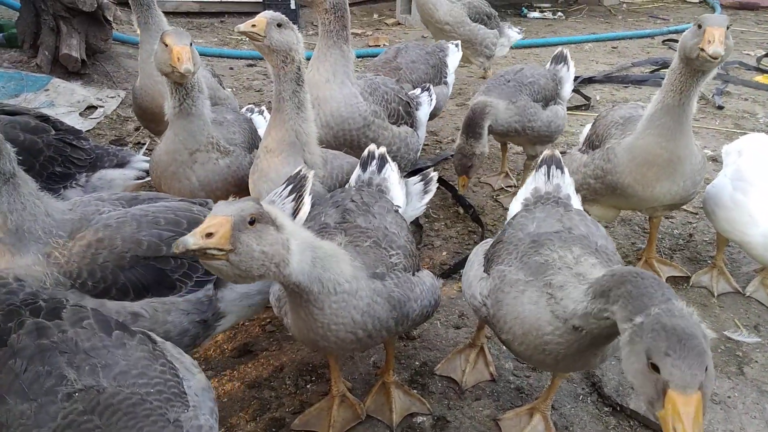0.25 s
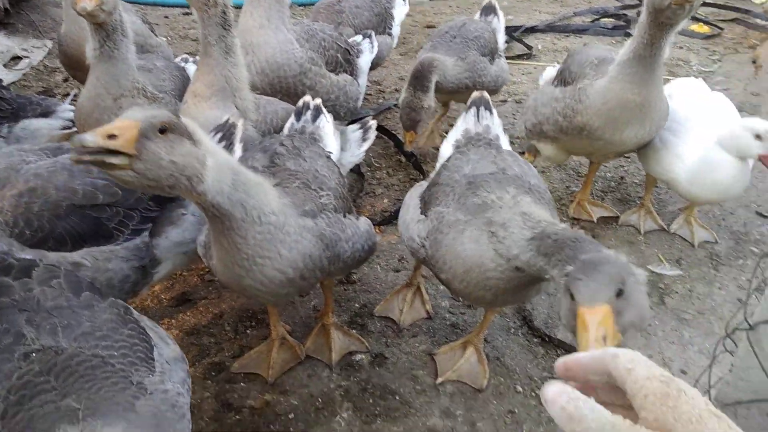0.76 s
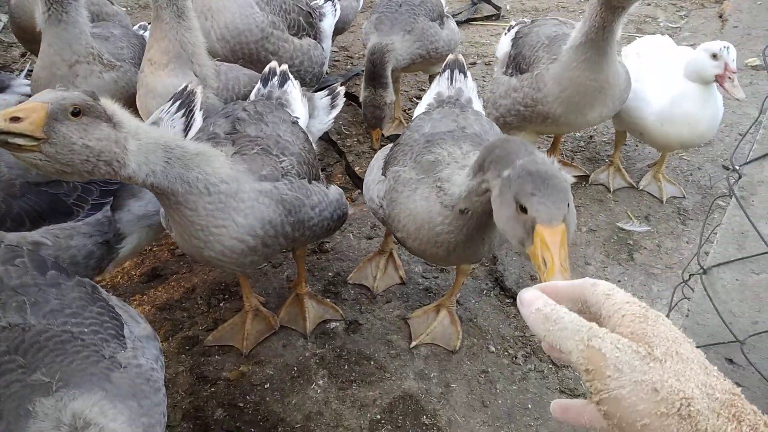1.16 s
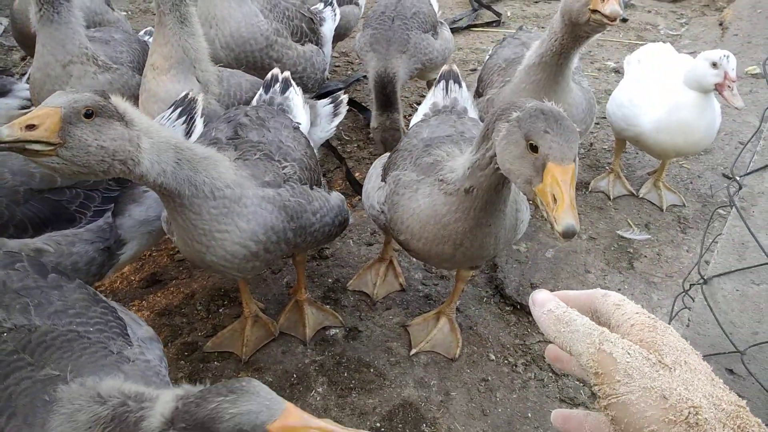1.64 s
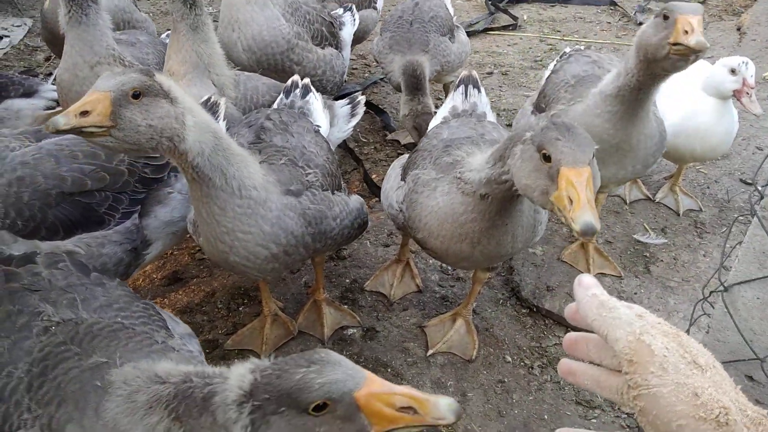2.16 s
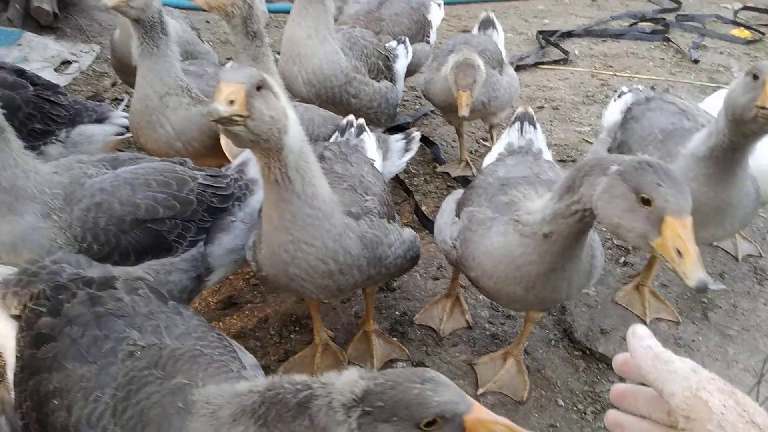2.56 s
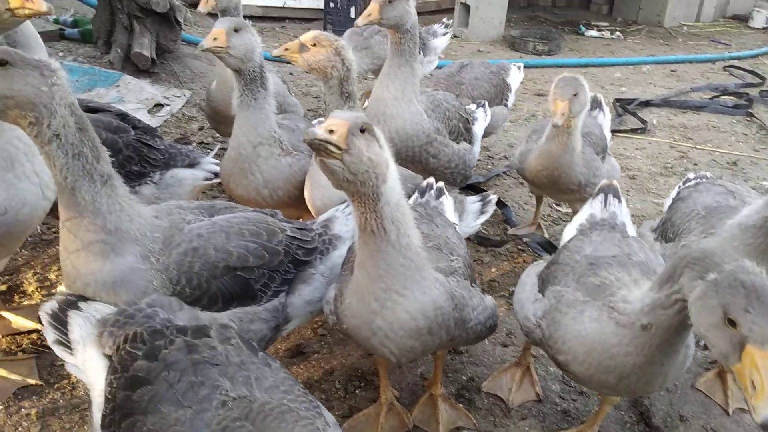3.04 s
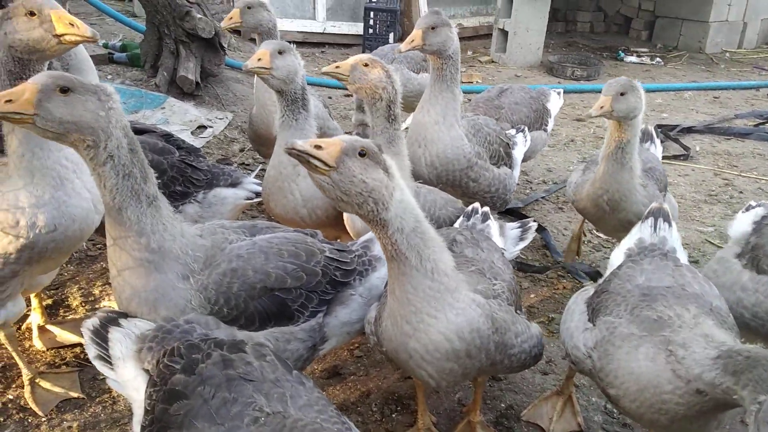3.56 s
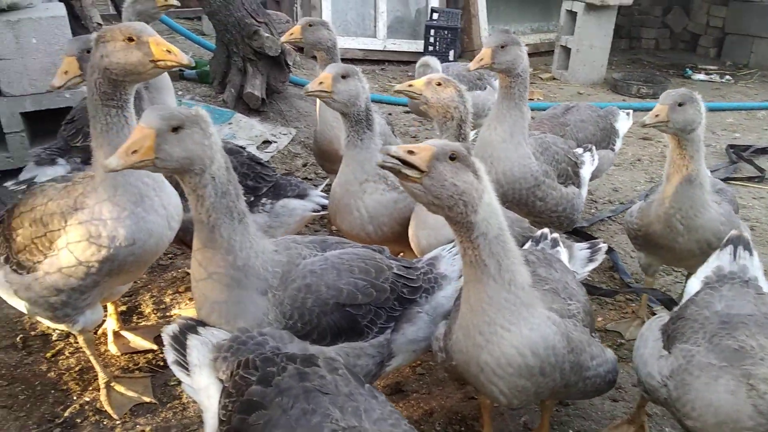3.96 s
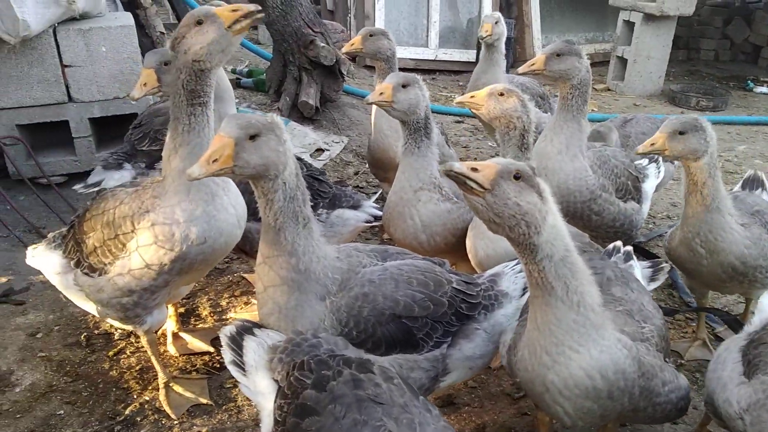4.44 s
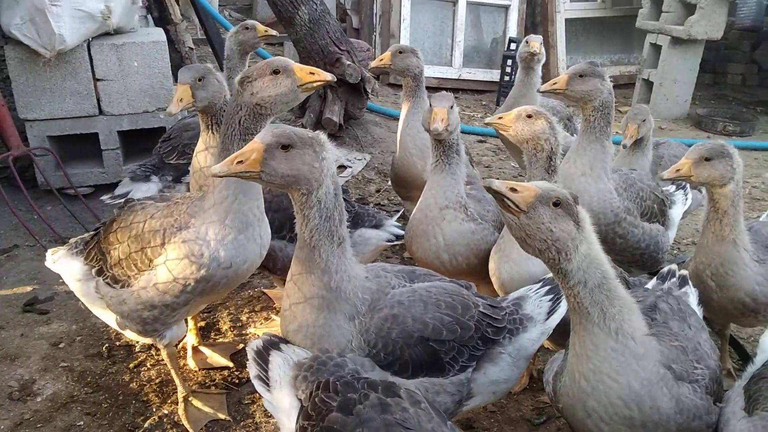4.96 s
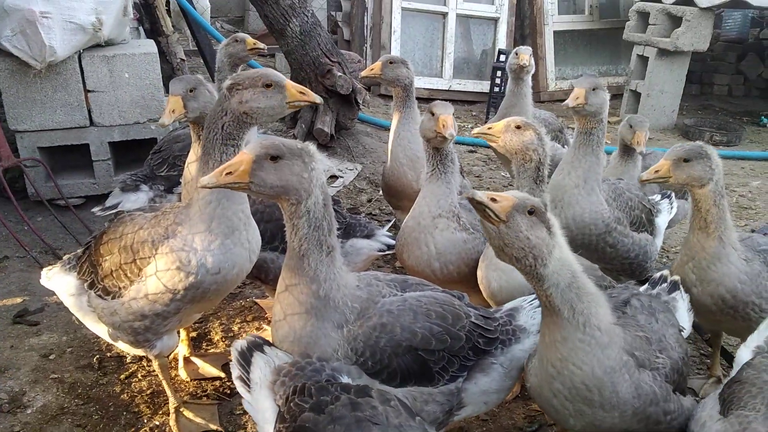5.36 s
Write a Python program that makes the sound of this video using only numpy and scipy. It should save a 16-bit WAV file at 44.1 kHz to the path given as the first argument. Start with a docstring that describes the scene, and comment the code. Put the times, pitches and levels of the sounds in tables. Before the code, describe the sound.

Young geese crowd close to the microphone in a dirt yard, with quiet low rumble and a short, faint echo from walls. The sound begins mid-yelp. Each yelp lasts under a tenth of a second: a clear tone near 1 kHz leaps up about an octave, breaks into rasp and tumbles down. Three come at 0.5-0.8 s, then groups at 1.3-1.7, 2.2-2.5 and 3.0-3.3 s. Short, nasal, hoarse gabbles at roughly 600-700 Hz fill between them, with thin whistles mostly around 1.5-1.9 kHz and a few very faint shrill squeals. Dry bill snaps click near 2.1, 2.25, 4.4 and 4.9 s; soft bumps and faint scuffs lie underneath. From 3.4 to 4.9 s rasping gabble runs almost unbroken and grows louder, with blurred distant birds behind. Four separate yelps follow from 4.9 s with clearer gaps, until an abrupt end at about 5.5 s.

```python
"""Young geese round an outstretched hand

A flock crowds close to the microphone in a dirt yard, all calling at once.
Near birds yelp in quick arches of pitch that break into a rasp; others gabble in short nasal notes
or whistle like goslings. Tones are sums of sines; rasps are irregular pulses through resonances.
Bills snap, feet scuff and low bumps knock; birds further back are heard by way of the walls,
which return a faint echo (scattered, decaying reflections) over low outdoor rumble (shaped noise)."""
import sys
import numpy as np
from scipy import signal
from scipy.fft import rfft, irfft, next_fast_len
from scipy.io import wavfile
from scipy.ndimage import uniform_filter1d

SR = 44100
rng = np.random.default_rng(int(sys.argv[2]) if len(sys.argv) > 2 else 0)


def wav_record(signal):
    """Record a signal, one row per channel, as 16-bit PCM in the file named by sys.argv[1]."""
    frames = np.transpose(np.atleast_2d(signal))
    bounded = np.clip(frames, -1, 1)
    # unit amplitude maps onto the largest positive 16-bit level
    quanta = np.round(bounded * 32767).astype(np.int16)
    wavfile.write(sys.argv[1], SR, quanta)


N = 246959

# spray of a bill snap or a scuff, only its shape counts: f/Hz, level/dB
SPRAY = [(300, -20), (1500, -49), (4500, -10), (7000, 7), (9500, 10), (12000, 11), (16000, -7)]
YELP_TAIL_S = 0.019  # a yelp trails off for this long after its fall


def from_db(db):
    """Amplitude ratio of a level in dB."""
    return 10 ** (np.asarray(db) / 20)


def rms_one(x):
    """Bring a sound to an RMS of 1."""
    return x / np.sqrt(np.mean(x ** 2) + 1e-20)


def span(start, end):
    """Sample times of one call, at least 5 ms of them."""
    return np.arange(round(start * SR), round(max(end, start + .005) * SR)) / SR


def add(out, t, sound):
    """Mix a call into the scene at its own times."""
    at = np.round(t * SR).astype(int)
    inside = (at >= 0) & (at < N)
    out[at[inside]] += sound[inside]


def waver(t, rate):
    """Random line of spread about 1, bounded at 1.6, bending at rate new values a second."""
    steps = (t - t[0]) * rate
    values = np.clip(rng.standard_normal(400), -1.6, 1.6)
    return np.interp(steps, np.arange(400), values)


def fade(t, start, end, attack, release):
    """Rounded opening and closing of a note, half open at its start and its end."""
    opening = (t - start) / attack + .5
    closing = (end - t) / release + .5
    return np.sin(np.pi / 2 * np.clip(np.minimum(opening, closing), 0, 1)) ** 2


def band(x, low_hz, high_hz, order=3):
    """Keep the range between two frequencies."""
    edges = [low_hz, min(high_hz, .49 * SR)]
    return signal.sosfilt(signal.butter(order, edges, "band", fs=SR, output="sos"), x)


def resonate(x, hz, width_hz):
    """One resonance with gain 1 on top."""
    r = np.exp(-np.pi * width_hz / SR)
    poles = [1, -2 * r * np.cos(2 * np.pi * hz / SR), r * r]
    return signal.lfilter(np.array([1, 0, -1]) * (1 - r * r) / 2, poles, x)


def colour(x, spectrum):
    """Shape a sound by a table of f/Hz, level/dB."""
    size = next_fast_len(len(x))
    hz, db = np.transpose(spectrum)
    bins = np.maximum(np.fft.rfftfreq(size, 1 / SR), 1)
    gain = from_db(np.interp(np.log(bins), np.log(hz), db))
    return irfft(rfft(x, size) * gain, size)[:len(x)]


def cycles(t, pitch, jitter):
    """Phase of a membrane whose pitch trembles quickly and wanders slowly."""
    unsteady = 1 + jitter * waver(t, 400) + .016 * waver(t, 70)
    return 2 * np.pi * (np.cumsum(pitch * unsteady) / SR + rng.random())


def yelps(tone_db=1):
    """Each yelp is a clear arch of pitch, a rasp that peaks early, and a low note under its fall."""
    # arched yelps: start t/s, length t/s, opening pitch f/Hz, tone level/dB before tone_db is added,
    # rasp level/dB, treble of the rasp level/dB
    yelp_calls = [(-.023, 0.062, 965, -22, -24.5, -9), (0.471, 0.071, 1036, -23, -21.5, -10.5),
                  (.61, .078, 1026, -19.5, -24, -7), (0.737, 0.086, 994, -19.5, -22.5, -8),
                  (1.331, 0.067, 978, -22, -30, -6.5), (1.461, 0.078, 968, -19, -22.5, -8.5),
                  (1.61, 0.081, 984, -20, -28.5, -3), (2.181, 0.065, 986, -23, -27.5, -10.5),
                  (2.317, 0.081, 979, -21.5, -22, -12), (2.452, 0.069, 954, -31, -31.5, -10.5),
                  (2.97, 0.067, 984, -27, -33.5, -8), (3.098, 0.081, 993, -23, -30.5, -6.5),
                  (3.246, .083, 1022, -24.5, -24, -12), (3.782, 0.089, 963, -45, -31, -35),
                  (3.952, 0.071, 979, -29, -25, -17.5), (4.94, 0.062, 969, -23.5, -22.5, -17.5),
                  (5.07, 0.095, 1030, -24.5, -28, -16.5), (5.213, 0.094, 1023, -22.5, -31, -10.5),
                  (5.391, 0.082, 1057, -23, -30, -9)]
    break_share, rasp_crest_share = .37, 0.34  # places along a yelp: voice breaks upward, hoarsest point
    low_delay_s = .012  # the low note comes in this long after the break
    low_share, low_db = .58, -14.5  # its share of the opening pitch, its level against the rasp
    out = np.zeros(N)
    for start, length, hz, db, rasp_db, treble_db in yelp_calls:
        jump, foot = start + break_share * length, start + length
        end = foot + YELP_TAIL_S
        add(out, *yelp(start, jump, foot, end, hz, db + tone_db))
        add(out, *rasp(start + .003, start + rasp_crest_share * length, foot, rasp_db, treble_db))
        add(out, *nasal_note(jump + low_delay_s, end, low_share * hz, 0, rasp_db + low_db))
    return out


def yelp(start, jump, foot, end, hz, open_db, crest_db=-15, overtone_db=-16, overtone_step_db=-6,
         buzz_db=-8):
    """The pitch clings to one windpipe resonance, jumps to the next, and tumbles back down through them."""
    # upper resonances that ring in a full yelp, for a 1000 Hz opening: f/Hz, width f/Hz, level/dB
    yelp_modes = [(1460, 104, 5.5), (2026, 107, 7), (2620, 74, 7), (2904, 460, -4.5), (4720, 160, -14.5),
                  (6330, 310, -10)]
    jitter, shimmer_db = .04, 2.2
    break_db, fall_db, tail_db = -7, -5, -10  # the tone at those moments, against its opening
    step_dip_db = 5.5  # the falling tone drops out between two resonances
    buzz_growth, buzz_from_db = 0.7, -23.5  # yelps louder than this buzz more: extra dB per dB
    t = span(start - .01, end + .01)
    crest = (jump + foot) / 2

    turns = [start, (start + jump) / 2, jump - .003, jump + .001, jump + .014, crest + .003,
             foot - .02, foot - .009, foot - .004, foot + .007, foot + .015, foot + .04]
    arch = [.93, 1.0, 1.15, 1.5, 1.6, 2.05,
            1.56, 1.38, 1.02, .88, .62, .56]
    wander = 1 + 0.0182 * waver(t, 60)  # no two yelps bend quite alike
    pitch = hz * wander * np.interp(t, np.maximum.accumulate(turns), arch)
    phase = cycles(t, pitch, jitter)

    # the clear tone gives way to rasp at the crest
    moments = [start, start + .01, jump - .006, jump + .006, crest,
               foot - .018, foot - .007, foot, foot + .011, end]
    levels = [-1, 0, -1, break_db, break_db + crest_db,
              fall_db - 3, fall_db - step_dip_db, fall_db, tail_db - step_dip_db, tail_db]
    db = open_db + np.interp(t, moments, levels)
    overtones = 0
    for k in range(2, 5):
        level_db = overtone_db + overtone_step_db * (k - 2.5) + waver(t, 250)
        overtones = overtones + from_db(level_db) * np.sin(k * phase)
    tone = np.sqrt(2) * (np.sin(phase) + overtones) * from_db(db + shimmer_db * waver(t, 300))

    # the hard push at the start also sets the upper pipe buzzing
    push_db = np.interp(t, [start, start + 0.011, jump + 0.0097, foot, end], [-36, -3, -4, -20.0, -43])
    loudness_db = open_db + buzz_db + buzz_growth * (open_db - buzz_from_db)
    buzz = rms_one(pipe(flapping(t), yelp_modes, hz / 1000)) * from_db(loudness_db + push_db)
    return t, (tone + buzz) * fade(t, start + .005, end, .009, .012)


def gabbles(tone_db=1.6):
    """Each gabble is a gliding nasal note with a rasp that swells and sinks over it."""
    # hoarse nasal gabbles: start t/s, length t/s, pitch f/Hz, glide f/Hz, tone level/dB before tone_db
    # is added, rasp level/dB, treble of the rasp level/dB, place of the crest (0-1)
    gabble_calls = [(0.119, 0.026, 572, -78, -37.5, -35.5, -21, 0.4),
                    (0.293, 0.033, 573, -40, -41.5, -31.5, -10, 0.23),
                    (0.357, 0.061, 697, -53, -38.5, -29, -12, 0.46),
                    (0.421, 0.056, 640, 37, -38.5, -36.5, -9.5, 0.56),
                    (0.641, 0.036, 603, 8, -29.5, -30.5, 0, 0.86),
                    (0.685, 0.058, 628, -145, -38, -28, -24, 0.6),
                    (0.864, 0.078, 749, 123, -39.5, -35, -19, 0),
                    (0.918, 0.067, 723, 126, -38, -36.5, -10.5, 0.95),
                    (1.031, 0.084, 725, 144, -36.5, -33, -13, 0.76),
                    (1.133, 0.041, 527, 143, -42, -36, -19, 0.6),
                    (1.169, 0.092, 722, 49, -39, -28.5, -15, .7),
                    (1.295, 0.069, 618, 243, -40, -35, -11, .7),
                    (1.436, 0.035, 635, 48, -36, -29, -15, 0.6),
                    (1.523, 0.047, 576, 36, -40, -28, -13, 0.35),
                    (1.572, 0.049, 587, 108, -37.5, -28, -11, 0.85),
                    (1.691, 0.1, 670, 81, -37, -27.5, -10, .4),
                    (1.858, 0.072, 671, 15, -33.5, -28, -4.5, 0.37),
                    (1.937, 0.029, 597, -83, -35, -38, -14, 0.2),
                    (2.01, 0.12, 603, 161, -37, -23.5, -14.5, 0.82),
                    (2.131, 0.048, 586, -140, -38, -33, -17, 0.04),
                    (2.211, 0.059, 592.5, 36, -37, -26, -13, 0.83),
                    (2.274, 0.057, 599, 60, -54, -36, 1.5, 0.8),
                    (2.345, 0.045, 620, 114, -32.5, -35, -7, .5),
                    (2.392, 0.041, 588, -88, -33.5, -49, -23, .2),
                    (2.575, 0.046, 537.5, 62, -38, -37, -16.5, 0.8),
                    (2.606, 0.075, 389, -43, -44.5, -37, -12, 0.42),
                    (2.68, 0.059, 370, -43, -48.5, -68, -19, 0.2),
                    (2.845, 0.043, 664, -68, -40, -36, -16, 0.47),
                    (3.176, 0.1, 706, 0, -53, -39.5, -7, 0.33),
                    (3.297, 0.071, 526, -30, -39, -33, -20, 0.63),
                    (3.393, 0.086, 678, 112, -38, -29.5, -9, 0.49),
                    (3.48, 0.022, 574, -80, -38, -39.5, -8, 0),
                    (3.547, 0.1, 653, -38, -40, -27.5, -6, 0.51),
                    (3.65, 0.11, 633, 60.5, -38, -25.5, -15.5, 0.72),
                    (3.774, 0.091, 669, 61, -38.5, -26.5, -7, 0.55),
                    (3.85, 0.072, 630, 83, -32, -24, -14.5, 0.6),
                    (3.918, 0.069, 654, 107.5, -35.5, -35, -20, 0.45),
                    (4.017, 0.058, 630.4, 88, -31.5, -27.5, -11.5, 0.38),
                    (4.083, 0.094, 587, 6, -41.5, -33, -16, 0.62),
                    (4.153, 0.056, 673, 45, -34, -28, -13.5, 0.25),
                    (4.283, .067, 631.5, 91, -34.5, -31.5, -7, 0.73),
                    (4.37, .054, 656, -38, -35, -22.5, -13, 0.2),
                    (4.425, .062, 635, 55, -33.5, -27.5, -12, 0.71),
                    (4.501, 0.061, 632, 114, -30.5, -24, -3.5, 0.63),
                    (4.565, 0.081, 653.5, 69, -33, -23.5, -15.5, 0.4),
                    (4.628, 0.038, 657, -17, -31, -27.5, -5.5, 0.56),
                    (4.682, 0.048, 657, 84, -29, -25.5, -0.5, 0.6),
                    (4.725, 0.07, 635, -45, -28, -22.5, -7, 0.54),
                    (4.793, 0.083, 572, 70, -44, -27, -19.5, 0),
                    (4.854, 0.059, 677, 105.5, -25.5, -26.5, 2, 0.74),
                    (4.903, 0.047, 649, 65, -28, -23, -4, 0.16), (5.001, 0.04, 652, -97, -42, -55, -20, .3),
                    (5.301, 0.049, 589, -76, -40.5, -50, -9, 0.4),
                    (5.365, 0.035, 672, 118, -33, -34, -18, 0.87),
                    (5.464, 0.03, 614, -84, -33, -39, -5, .4),
                    (5.494, .038, 593, -48, -45.5, -40, -37, 0.2)]
    out = np.zeros(N)
    for start, length, hz, glide_hz, db, rasp_db, treble_db, crest_share in gabble_calls:
        end = start + length
        crest = start + np.clip(crest_share, 0, 1) * length
        add(out, *nasal_note(start, end, hz, glide_hz, db + tone_db))
        add(out, *rasp(start, crest, end, rasp_db, treble_db))
    return out


def nasal_note(start, end, hz, glide_hz, db):
    """A short reedy note: seven unsteady harmonics, each as strong as the throat lets its pitch through."""
    # strength of the harmonics in the throat: f/Hz, level/dB
    nasal_throat = [(370, -6), (520, 1), (640, -2), (780, -3.5), (1050, -3.5), (1280, 1.5), (1550, -0.5),
                    (1850, -8.5), (2100, -10.5), (2600, -21), (4500, -26)]
    jitter, shimmer_db = .017, 2.6
    note_swell_db = 6.5  # louder in the middle than at the ends by this much
    arch_hz = 25.4  # the middle lies this far above the ends
    t = span(start - .01, end + .01)
    along = np.clip((t - start) / (end - start), 0, 1)
    pitch = hz + glide_hz * (along - .5) - arch_hz * (2 * along - 1) ** 2
    phase = cycles(t, pitch, jitter)
    throat_hz, throat_db = np.transpose(nasal_throat)
    note = 0
    for k in range(1, 8):
        strength_db = np.interp(np.log(k * pitch), np.log(throat_hz), throat_db)
        note = note + from_db(strength_db + shimmer_db * waver(t, 126.3)) * np.sin(k * phase)
    swell_db = note_swell_db * (np.sin(np.pi * along) - .75)
    return t, np.sqrt(2) * note * from_db(db + swell_db) * fade(t, start, end, .012, .01)


def rasp(start, crest, end, db, treble_db, hiss_db=1.0, size_spread_db=0.99, mouth_echo=0.4,
         onset_db=17, release_db=26):
    """Irregular pulses ring a windpipe of random size and spray from the bill."""
    # resonances of the long windpipe at average size: f/Hz, width f/Hz, level/dB
    windpipe = [(260, 66, -16.5), (590, 70, -1.5), (965, 150, -1), (1382, 304, -1), (1535, 232, 4),
                (2097, 113, -10)]
    # colour of the open bill: f/Hz, level/dB
    open_bill = [(1290, 6), (2200, -1), (2410, -0.5), (2640, -6.5), (3270, -7), (3950, -5), (4510, -2.5),
                 (5230, -6), (6220, -5.5), (7400, -11), (7900, -7), (8650, -9), (9550, -6.5), (11400, -6),
                 (15800, -21)]
    rasp_swell_db = 10.5  # it swells to its crest and sinks again by this much
    opening_share = 0.35  # it gets going in this share of the time up to its crest
    bill_share = 0.68  # share of the treble level that the range from 2 to 7 kHz takes
    hiss_swell = 0.18  # the treble swells this much more steeply than the throat
    t = span(start - .012, end + 0.029)
    source = flapping(t) * from_db(2.8 * waver(t, 120))
    throat = pipe(source, windpipe, from_db(size_spread_db * rng.standard_normal()))

    # reflections in the mouth and off the ground ripple the treble
    paths = np.zeros(round(.003 * SR))
    paths[rng.integers(6, len(paths), size=6)] = mouth_echo * rng.choice([-1, 1], size=6)
    paths[0] = 1
    mouth = colour(signal.lfilter(paths, [1], source), open_bill)

    opened = start + opening_share * (crest - start)
    effort = np.interp(t, [start - .005, opened, crest, end, end + 0.039],
                       [-onset_db, -rasp_swell_db / 2, 0, -rasp_swell_db, -rasp_swell_db - release_db])
    treble_db = treble_db + hiss_swell * np.maximum(effort, -rasp_swell_db)
    body = rms_one(band(throat, 228, 2220))
    bill = from_db(bill_share * treble_db) * rms_one(band(mouth, 2170, 7300, order=4))
    hiss = from_db(treble_db + hiss_db) * rms_one(band(mouth, 8080, 15600, order=4))
    voice = body + bill + hiss
    return t, voice * from_db(db + effort) * fade(t, start - .001, end + .018, .009, .014)


def flapping(t, flap_hz=480, uneven_db=2.0, air=1.0, puff_s=0.00094):
    """Uneven slaps of the syrinx, each letting through a puff of turbulent air."""
    rate_hz = flap_hz * from_db(rng.normal(0, 1.5))
    count = np.floor(cycles(t, rate_hz, jitter=.2) / (2 * np.pi))
    strength = from_db(uneven_db * np.clip(rng.standard_normal(len(t)), -2, 1.5))
    slaps = np.diff(count, prepend=count[0]) * strength
    puffs = signal.lfilter([1], [1, -np.exp(-1 / (puff_s * SR))], slaps)
    return rms_one(slaps) + air * rms_one(puffs * rng.standard_normal(len(t)))


def pipe(source, modes, size):
    """Parallel windpipe resonances of alternating sign, their frequencies multiplied by size."""
    out = 0
    for k, (hz, width_hz, db) in enumerate(modes):
        out = out + (-1) ** k * from_db(db) * resonate(source, hz * size, width_hz)
    return out


def whistles():
    """Gosling whistles of the near birds: an arch laid over a glide."""
    # thin whistles: start t/s, length t/s, middle pitch f/Hz, glide f/Hz, level/dB
    whistle_calls = [(.14, 0.028, 1560, -180, -47), (0.271, 0.084, 1370, -8, -43.5),
                     (0.604, 0.021, 1460, 90, -31), (0.832, 0.048, 1772, -220, -34),
                     (0.899, 0.15, 4600, 25, -48), (0.966, 0.14, 1760, -140, -45.5),
                     (1.09, .06, 1750, -240, -42), (1.26, .06, 1560, -330, -39.5),
                     (1.797, 0.054, 1880, -880, -42), (1.953, 0.045, 1520, -440, -40.5),
                     (2.275, 0.032, 1625, 290, -30.5), (2.486, 0.055, 1900, -320, -42),
                     (2.496, 0.11, 4550, -330, -47.5), (2.799, 0.068, 1540, 124, -41.5),
                     (2.889, 0.08, 1610, 22, -33), (2.996, 0.099, 1634, -160, -32),
                     (3.171, 0.0344, 1560, -46, -29.5), (3.221, 0.033, 1770, 40, -45),
                     (3.33, 0.083, 1880, -130, -46), (3.47, .06, 1880, -200, -36.5),
                     (4.051, .06, 1940, -400, -41), (4.188, 0.068, 1820, -340, -39),
                     (4.543, .05, 1710, -76, -28), (5.307, 0.065, 4440, -610, -49)]
    arch_hz_per_s = 3000  # the longer a whistle, the higher its middle rises above its ends
    out = np.zeros(N)
    for start, length, hz, glide_hz, db in whistle_calls:
        ends_hz = hz - arch_hz_per_s * length
        bend_hz = [ends_hz - glide_hz / 2, hz, ends_hz + glide_hz / 2]
        add(out, *slur(start, start + length / 2, start + length, bend_hz, db))
    return out


def slur(start, turn, end, hz, db):
    """A thin whistle that bends once; the shrillest tremble into a breathy squeal."""
    whistle_swell_db = 6.5  # louder in the middle than at the ends by this much
    t = span(start - .01, end + .01)
    jitter = np.interp(hz[1], [2000, 4500], [.02, .08])
    pitch = uniform_filter1d(np.interp(t, [start, turn, end], hz), size=len(t) // 3)
    phase = cycles(t, pitch, jitter)
    overtones = sum(from_db(-32 + 6 * waver(t, 300)) * np.sin(k * phase) for k in (2, 3))
    shimmer_db = 2.6 * waver(t, 140) + 1.5 * waver(t, 600)
    along = np.clip((t - start) / (end - start), 0, 1)
    swell_db = whistle_swell_db * (np.sin(np.pi * along) - .7)
    level = from_db(db + swell_db + shimmer_db)
    return t, np.sqrt(2) * (np.sin(phase) + overtones) * level * fade(t, start, end, 0.012, 0.0059)


def snaps(decay_db_per_s=900):
    """Brief, bright cracks of a closing bill: a fast-dying burst of slaps and turbulent air."""
    # sharp snaps: t/s, level/dB
    bill_snaps = [(.296, -39), (2.105, -27), (2.245, -28.5), (4.379, -26), (4.637, -33), (4.89, -30)]
    out = np.zeros(N)
    for start, db in bill_snaps:
        t = span(start - .002, start + .04)
        crack = rms_one(colour(flapping(t), SPRAY))
        level = from_db(db - decay_db_per_s * (t - start))
        add(out, t, crack * level * fade(t, start, start + 0.032, 0.0032, .01))
    return out


def rustle(scuffs_per_s=16, scuff_s=0.049, spread_db=3):
    """Scuffs of feet on dirt and of feathers against each other: bursts of sparse random grains."""
    # stretch when feet and feathers stir: start t/s, end t/s, level/dB
    stirring = (.8, 5.0, -53.5)
    out = np.zeros(N)
    first, last, db = stirring
    for start in np.arange(first, last, 1 / scuffs_per_s):
        start = start + rng.uniform(-.02, .02)
        t = span(start - .02, start + 2 * scuff_s)
        grit = rng.standard_normal(len(t)) * (rng.random(len(t)) < .1)
        level = from_db(db + spread_db * rng.standard_normal())
        scuff = rms_one(colour(grit, SPRAY)) * level
        add(out, t, scuff * fade(t, start, start + scuff_s, 0.0096, scuff_s))
    return out


def bumps():
    """Soft, low knocks close by: unsteady sines that ring for a few cycles."""
    # dull bumps: start t/s, f/Hz, length t/s, peak level/dB
    dull_bumps = [(.335, 144, 0.043, -47.5), (1.19, 126, 0.022, -45), (2.507, 81.5, 0.059, -39.5),
                  (2.665, 185, 0.015, -43)]
    out = np.zeros(N)
    for start, hz, length, db in dull_bumps:
        t = span(start - .01, start + 2 * length)
        knock = from_db(db) * np.sin(cycles(t, hz, 0.074))
        add(out, t, knock * fade(t, start, start + length, 0.0039, length))
    return out


def far_flock(calls_per_s=17, call_s=.11):
    """Birds at the back slur at random pitches, heard only by way of the walls."""
    # stretches when they join in: start t/s, end t/s, level/dB ahead of the walls and the final mix
    far_stretches = [(0.779, 1.78, -41.5), (1.994, 2.5, -38.5), (3.148, 4.95, -35.5)]
    out = np.zeros(N)
    for first, last, db in far_stretches:
        # one random shift for all the calls of a stretch
        starts = np.arange(first, last - call_s, 1 / calls_per_s) + rng.uniform(-0.016, 0.016)
        for start in starts:
            hz = rng.uniform(950, 1850) * np.array([.87, 1.08, .8]) * rng.uniform(.93, 1.07, 3)
            turn = start + call_s * rng.uniform(0.364, 0.703)
            add(out, *slur(start, turn, start + call_s, hz, db + rng.normal(0, 1.3)))
    return yard_echo(out)


def yard_echo(x, t60_s=0.2):
    """Scattered reflections from walls and ground, the first after 6 ms, dying by 60 dB in t60_s."""
    t = span(0, .4)
    scatter = rng.standard_normal(len(t)) * (rng.random(len(t)) < .03) * (t > .006)
    response = band(scatter * from_db(-60 * t / t60_s), 1950, 12000, order=1)
    return signal.fftconvolve(x, response / np.sqrt(np.sum(response ** 2)))[:N]


def open_air(level_db=-51):
    """Steady outdoor rumble: noise weighted towards the lows."""
    # outdoor background, only its shape counts: f/Hz, level/dB
    yard_spectrum = [(25, -2), (40, -3), (70, -1), (150, -7), (300, -17), (600, -20), (1500, -26),
                     (3000, -33), (8000, -37), (15000, -39)]
    return from_db(level_db) * rms_one(colour(rng.standard_normal(N), yard_spectrum))


def scene():
    """The near flock, its echo, the birds further back, the bumps and the open air."""
    echo_db, far_db = -15.5, -3.0
    flock = yelps() + gabbles() + whistles() + snaps() + rustle()
    echo = from_db(echo_db) * yard_echo(flock)
    far = from_db(far_db) * far_flock()
    return (flock + echo + far + bumps() + open_air())[None]


def record(dry):
    """The microphone's range: the deepest rumble below 18 Hz and the top above 15.9 kHz are cut."""
    dry = signal.sosfilt(signal.butter(2, 18, "high", fs=SR, output="sos"), dry)
    return signal.sosfilt(signal.ellip(10, .1, 80, 15900, fs=SR, output="sos"), dry)


dry = scene()
out = record(dry)
wav_record(out)
```